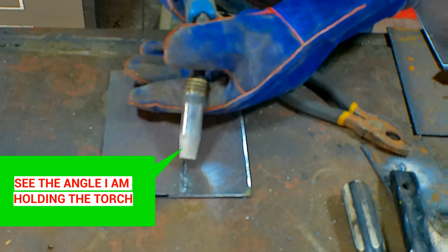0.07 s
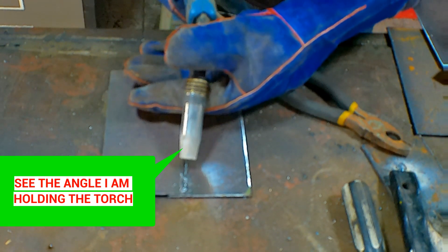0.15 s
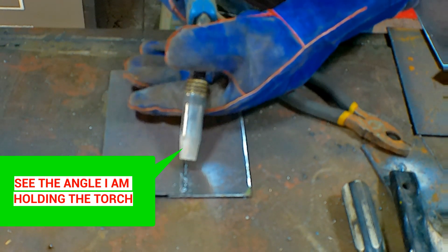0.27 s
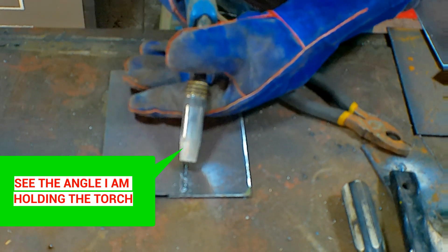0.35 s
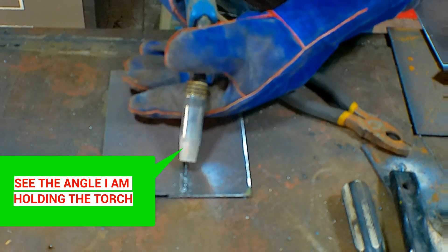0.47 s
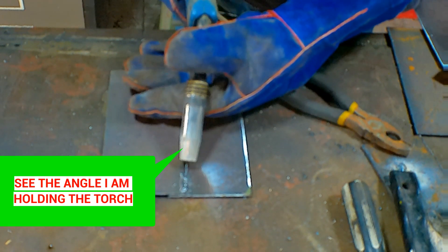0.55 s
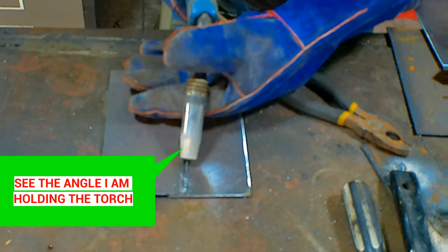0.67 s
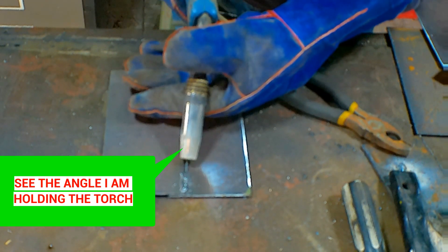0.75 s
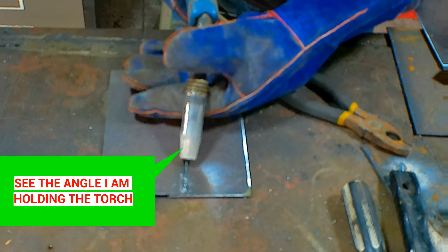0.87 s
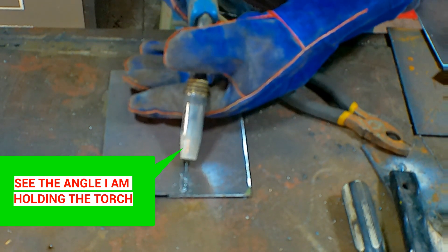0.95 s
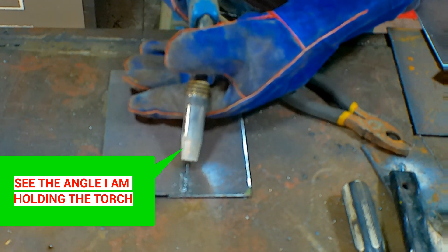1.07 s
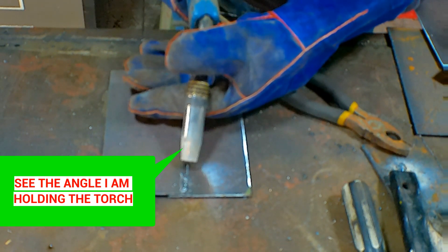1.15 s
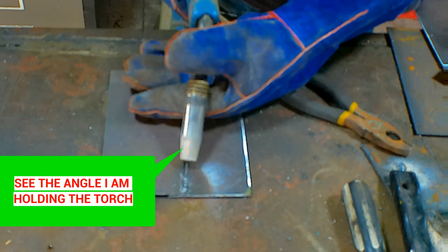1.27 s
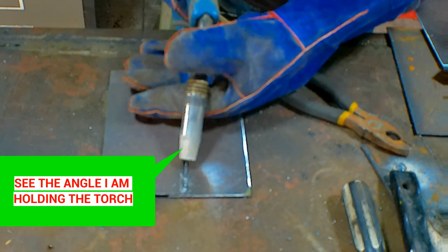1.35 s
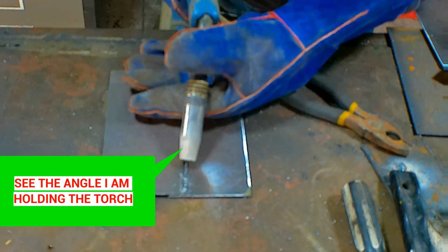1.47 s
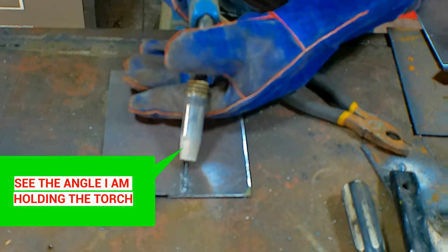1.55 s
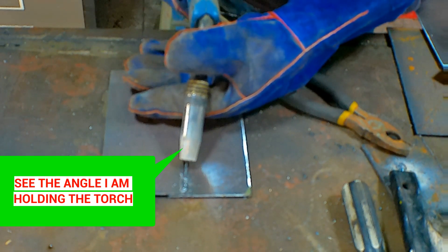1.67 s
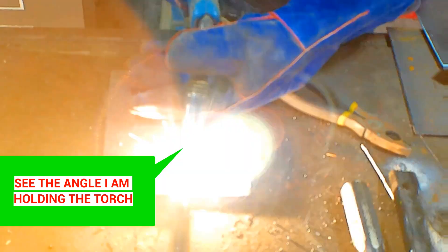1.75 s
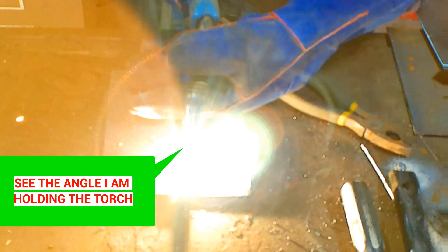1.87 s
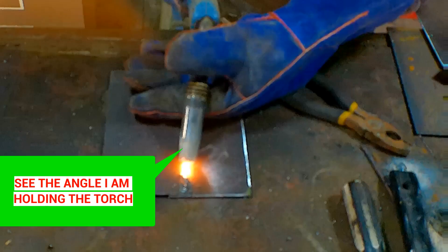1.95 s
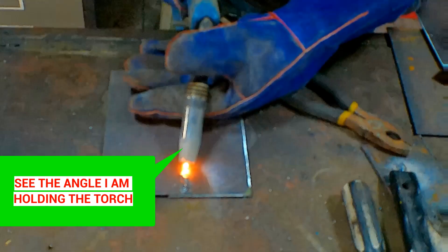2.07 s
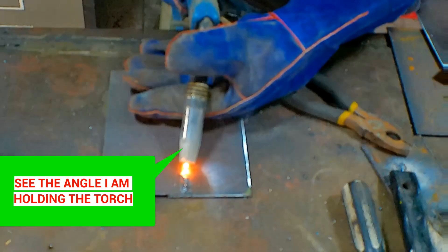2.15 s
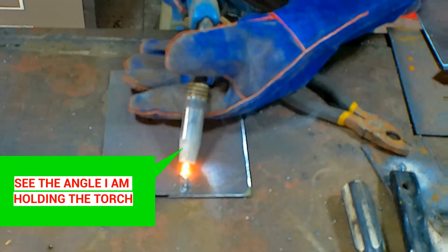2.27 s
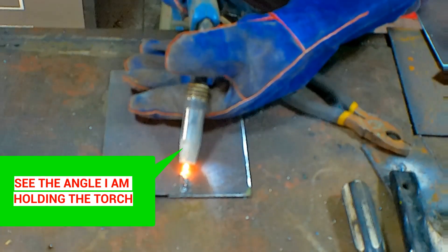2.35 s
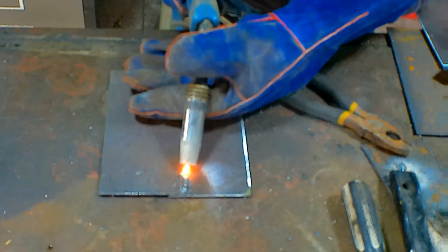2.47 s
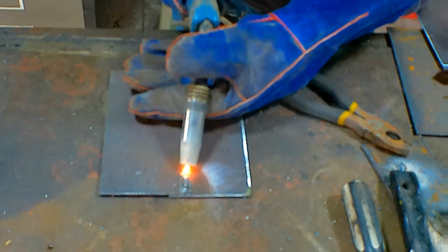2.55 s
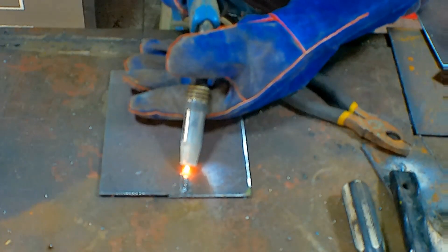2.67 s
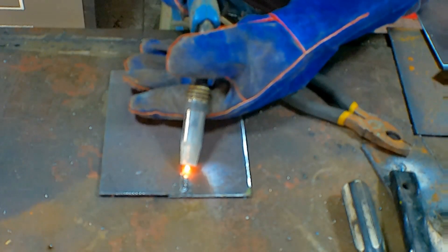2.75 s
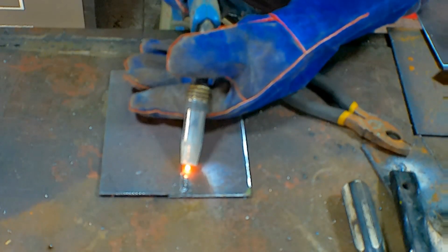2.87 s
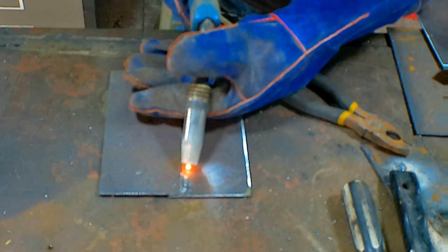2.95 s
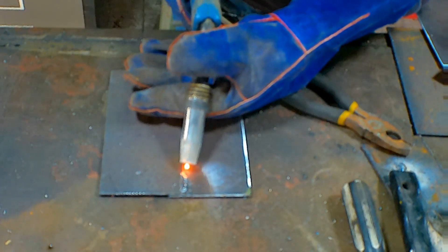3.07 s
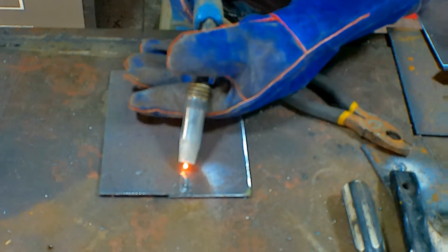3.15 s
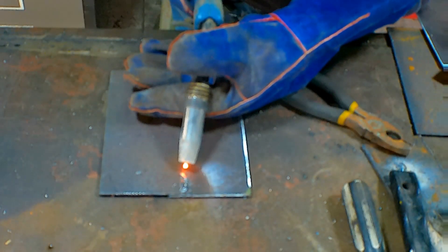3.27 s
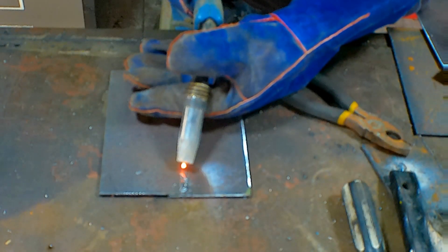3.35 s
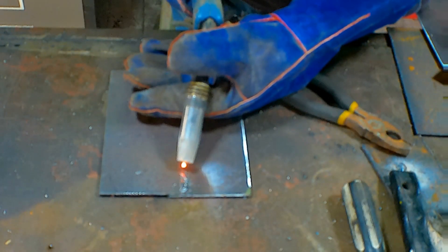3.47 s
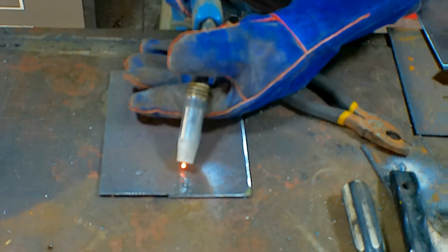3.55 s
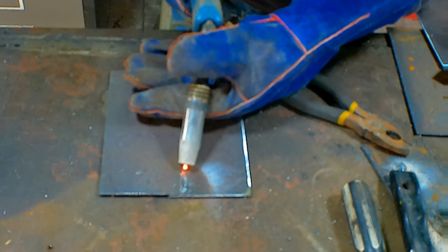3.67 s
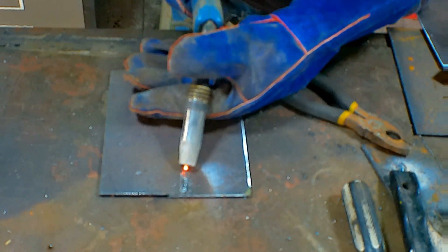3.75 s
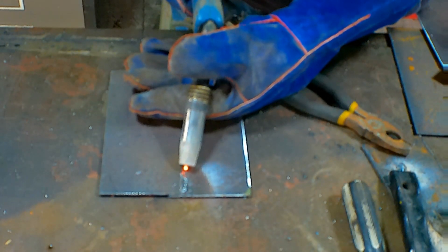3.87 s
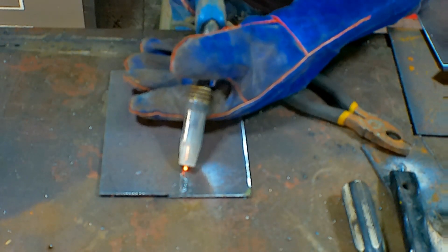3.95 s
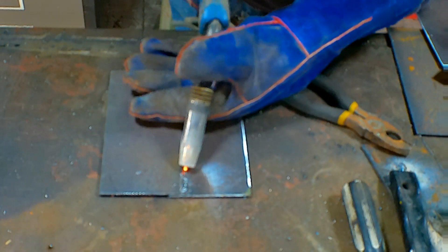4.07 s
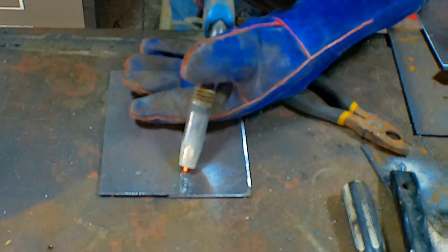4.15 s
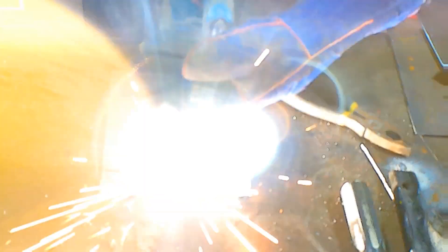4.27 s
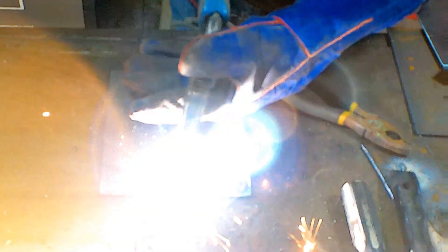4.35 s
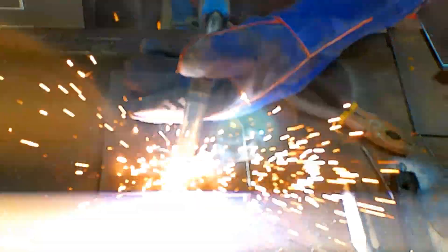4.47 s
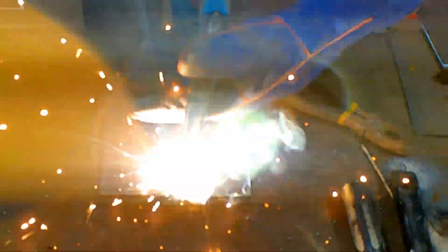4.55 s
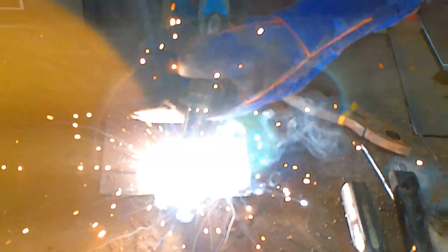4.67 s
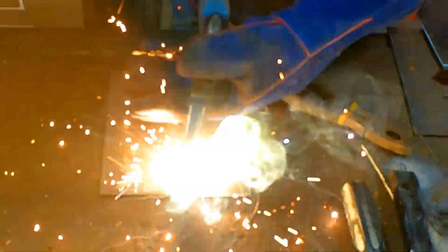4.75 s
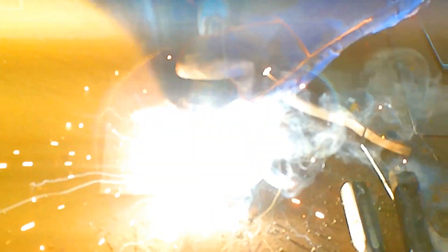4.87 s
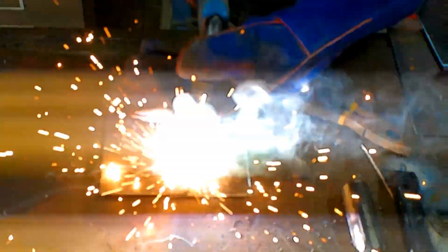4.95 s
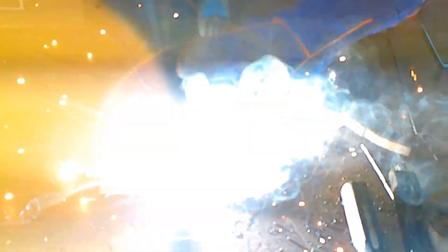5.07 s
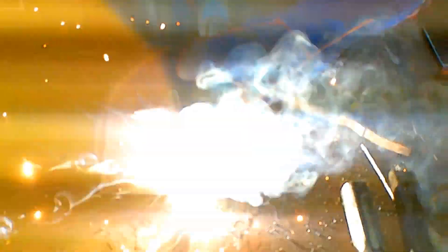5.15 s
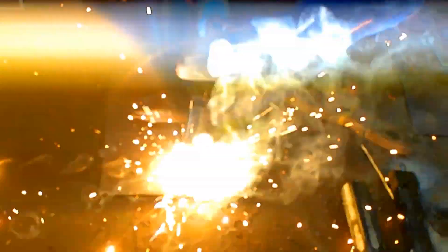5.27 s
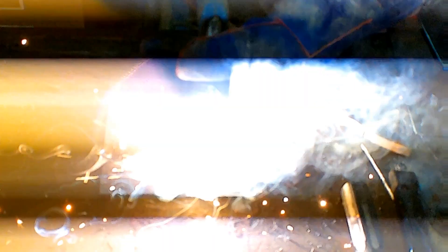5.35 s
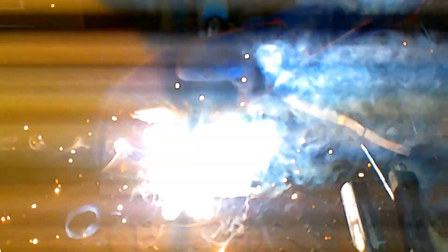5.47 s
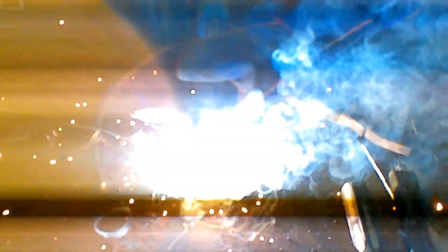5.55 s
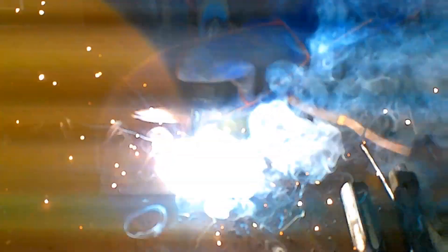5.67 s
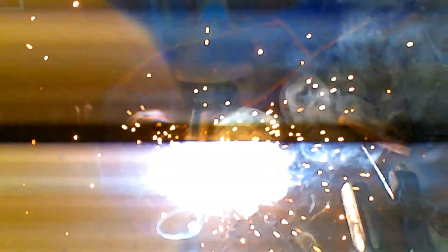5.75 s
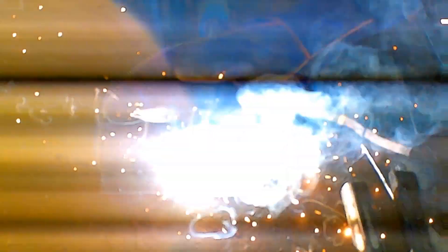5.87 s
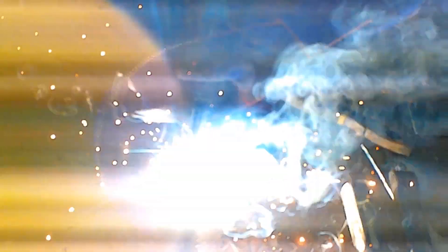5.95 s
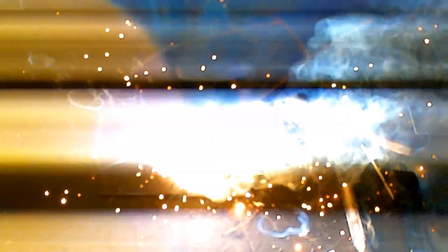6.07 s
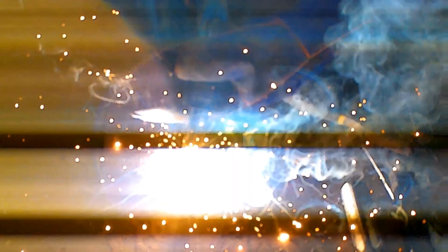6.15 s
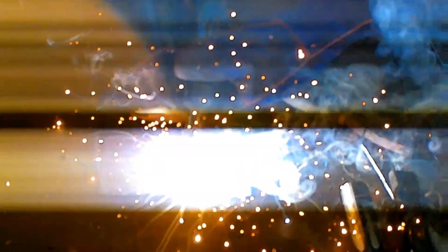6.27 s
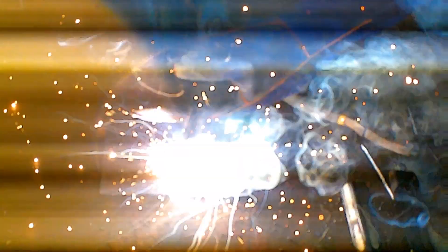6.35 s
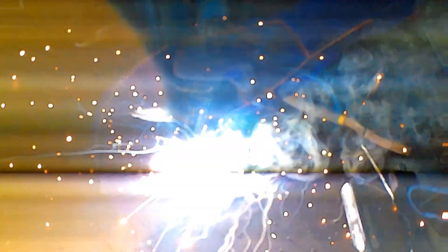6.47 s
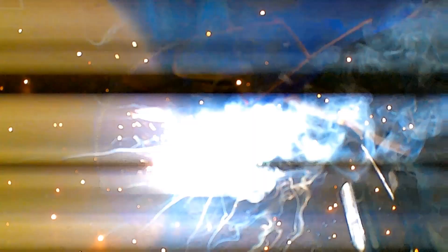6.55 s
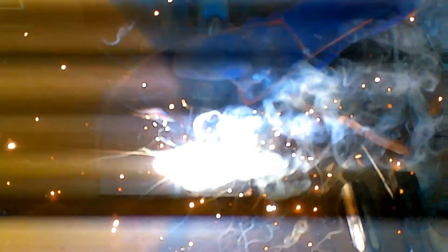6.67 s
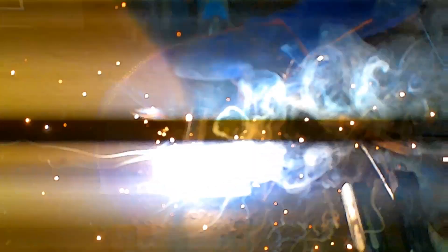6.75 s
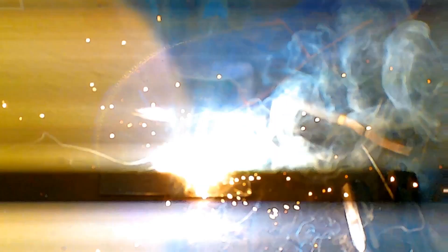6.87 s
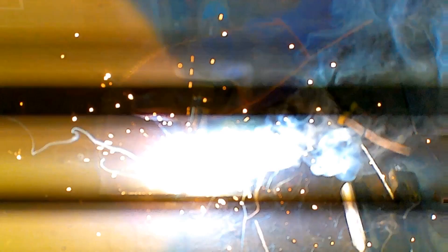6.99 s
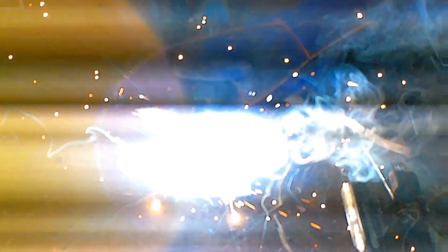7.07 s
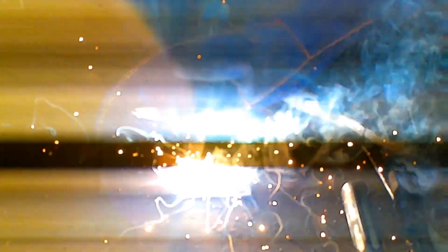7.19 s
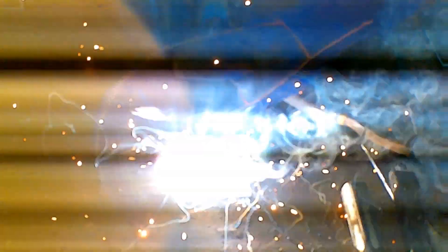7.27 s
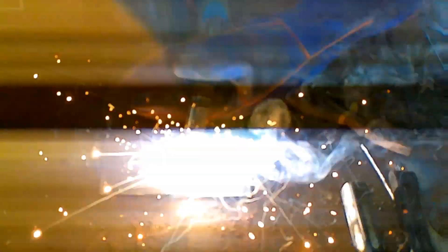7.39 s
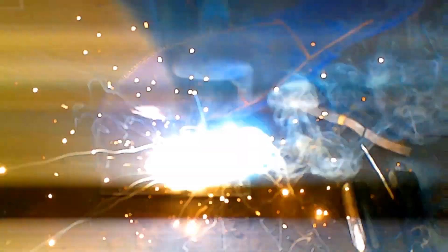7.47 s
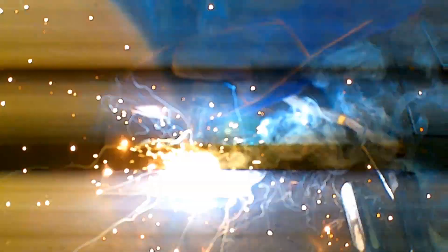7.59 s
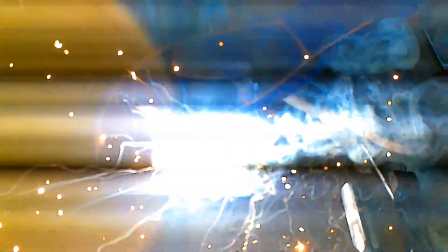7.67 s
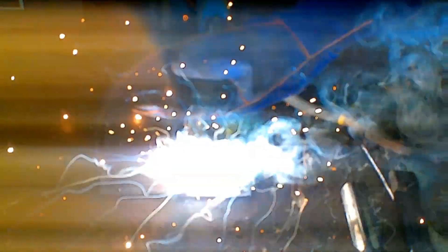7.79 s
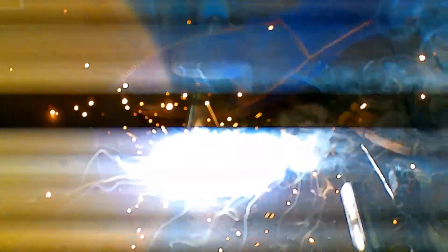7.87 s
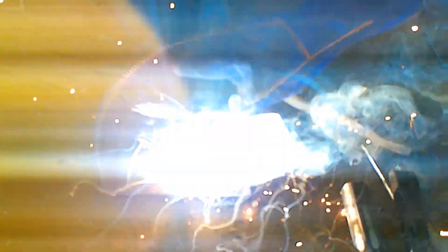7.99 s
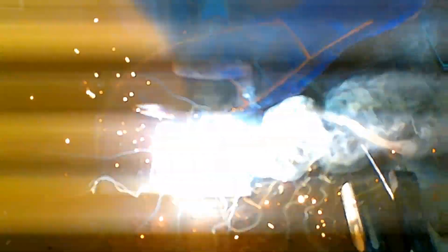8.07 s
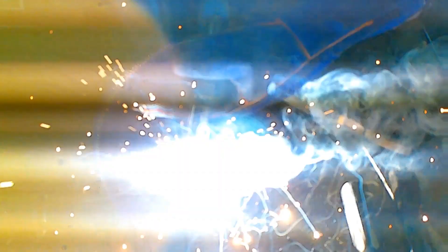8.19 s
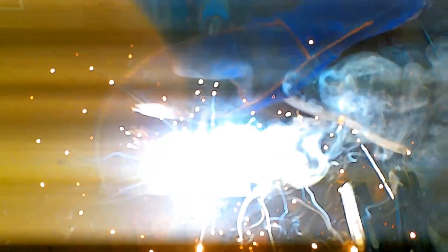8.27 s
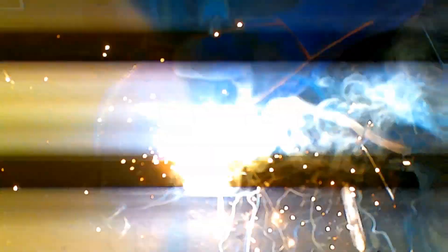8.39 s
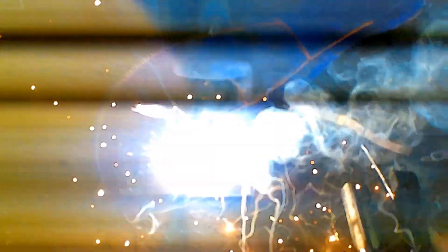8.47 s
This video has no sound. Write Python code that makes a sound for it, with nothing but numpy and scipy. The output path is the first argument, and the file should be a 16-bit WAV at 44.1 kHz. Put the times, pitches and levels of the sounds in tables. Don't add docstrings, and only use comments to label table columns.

```python
import sys
import numpy as np
from scipy import signal
from scipy.io import wavfile
from scipy.ndimage import uniform_filter1d

SR = 44100
rng = np.random.default_rng(int(sys.argv[2]) if len(sys.argv) > 2 else 0)


def unload_audio(sound):
    columns = np.transpose(np.atleast_2d(sound))
    steps = np.round(np.clip(columns, -1, 1) * 32767)
    wavfile.write(sys.argv[1], SR, steps.astype(np.int16))


def gain_from_db(level_db):
    decades = np.asarray(level_db, float) / 20
    return 10 ** decades


N = 375732


def evened(x):
    return x / np.sqrt(np.mean(x ** 2) + 1e-20)


def read(points, hz):
    f, value = np.transpose(points)
    return np.interp(np.log(hz + 1), np.log(f + 1), value)


def along(rows, column=1, off=-120.):
    rows = np.array(rows)
    return np.interp(np.arange(N) / SR, rows[:, 0], rows[:, column], off, off)


def humps(rows, t):
    return sum(height * np.maximum(1 - abs(t - middle) / half, 0) for middle, half, height in rows)


def causal(db):
    mirrored = np.r_[db, db[-2:0:-1]]
    log = np.log(gain_from_db(np.maximum(mirrored, -100)))
    taps = np.fft.ifft(np.exp(log - 1j * signal.hilbert(log).imag)).real[:len(db)]
    return taps / np.linalg.norm(taps)


def train(s, size):
    return np.bincount(np.round(np.asarray(s) * SR).astype(int), size, N)[:N]


def dying(x, seconds):
    return signal.lfilter([1], [1, -np.exp(-1 / (seconds * SR))], x)


def wander(hz):
    return evened(signal.lfilter(*signal.butter(2, hz, fs=SR), rng.standard_normal(N)))


def ringing(x, hz, t60):
    t = np.arange(int(t60 * SR)) / SR
    mode = gain_from_db(-60 * t / t60) * np.sin(2 * np.pi * hz * t)
    return signal.oaconvolve(x, mode)[:N]


def puff(x, seconds):
    u = np.arange(1200) / (seconds * SR)
    push = -(1 - u) * np.exp(-u) * np.minimum(u / 0.26, 1)
    return signal.oaconvolve(x, push)[:N]


def hum(lines, drift, depth_db):
    turns = np.cumsum(1 + drift * wander(3.5)) / SR
    out = np.zeros(N)
    for hz, db in lines:
        level = np.sqrt(2) * gain_from_db(db + depth_db * wander(8))
        out += level * np.sin(2 * np.pi * (hz * turns + rng.random()))
    return out


# pitch_hz, density_db [dB per Hz]
AIR = [(12, -46.5), (20, -8), (22, 2), (48, -7), (177, -5.5), (216, -14), (248, -8.5), (277, -6),
       (590, -6.5), (642, -6), (1220, -10.5), (1710, -16), (5530, -30), (6180, -34.5), (16000, -39.5)]


def fan_air():
    frames, hz = N // 256 + 5, np.fft.rfftfreq(1024, 1 / SR)
    a, b, patches = rng.standard_normal((frames, 513, 3)).T
    patches = evened(uniform_filter1d(uniform_filter1d(patches, 8, 0), 12, 1))
    spectrum = (a + 1j * b) * gain_from_db(read(AIR, hz)[:, None] + 1.7 * patches)
    air = signal.istft(spectrum, nperseg=1024, noverlap=768)[1][:N]
    return gain_from_db(-39.5) * evened(air)


# pitch_hz, level_db [rms]
FAN = [(177.6, -51), (253, -53.5), (403.7, -53), (506, -59), (602.9, -51.5), (1206, -55.5)]
# pitch_hz, level_db [rms]
FEEDER = [(290.7, -50), (872.1, -51.5), (1157, -53), (5405, -64)]
# pitch_hz, level_db [rms]
GEARS = [(4700, -66), (7267, -72), (10584, -76)]
# time_s, level_db
FEEDING = [
    (1.95, -30),
    (2.03, 0.5),
    (3.03, 0.5),
    (3.08, -12),
    (3.28, -12),
    (3.36, -.5),
    (4.26, 0.5),
]


def machine():
    feeder = hum(FEEDER, 0.00027, 1) + wander(70) * hum(GEARS, 0.00052, 1)
    return fan_air() + hum(FAN, 0.0019, 3.3) + gain_from_db(along(FEEDING)) * feeder


# middle_s, half_length_s, level_db
RUSTLES = [
    (.2, .03, -59),
    (.32, .06, -51),
    (.59, .05, -54),
    (.72, .05, -58),
    (1.035, .06, -52),
    (3.76, .07, -53),
]


def glove():
    stroke = humps([(s, half, gain_from_db(db)) for s, half, db in RUSTLES], np.arange(N) / SR)
    clumps = rng.exponential(1, N) * (rng.random(N) < 250 / SR)
    grains = dying(clumps, .003) * rng.standard_normal(N)
    return stroke * evened(signal.lfilter(*signal.butter(1, [1300, 6000], "band", fs=SR), grains))


# start_s, scratch_db, ring_hz, ring_db
TICKS = [(.0462, -38, 5400, -50), (.128, -44, 5300, -46), (.195, -54, 1900, -39), (.2835, -48, 2400, -42),
         (.325, -48, 2120, -40), (.5931, -42, 5300, -41), (.616, -39, 5200, -36), (.7587, -47, 6200, -50),
         (.832, -56, 780, -33), (0.9914, -27.5, 2380, -36), (1.0173, -31, 7000, -44),
         (1.032, -44, 1575, -27), (1.052, -50, 800, -28), (1.105, -34, 5300, -41), (1.343, -42, 5740, -47),
         (2.5767, -48, 2440, -37), (2.615, -50, 2460, -40), (2.7222, -43, 2450, -43),
         (2.87, -39, 10200, -54), (3.708, -32, 2510, -28), (3.7439, -46, 2500, -38.5),
         (3.78, -43, 2520, -35), (3.8, -40, 2520, -38), (3.801, -46, 10300, -50)]


def ticks():
    out, t = np.zeros(N), np.arange(2600) / SR
    chance = rng.standard_normal((len(TICKS), 2, len(t)))
    band = signal.butter(2, [1800, 11500], "band", fs=SR)
    for (s, db, hz, ring_db), (noise, shake) in zip(TICKS, chance):
        scratch = signal.lfilter(*band, noise) * np.exp(-t / 0.0038)
        fuzz = 0.73 + evened(uniform_filter1d(shake, 40))
        ring = np.sin(2 * np.pi * hz * t) * fuzz * np.exp(-t / 0.0074)
        out[round(s * SR):][:len(t)] += gain_from_db(db) * scratch + gain_from_db(ring_db) * ring
    return out


# start_s, tick_db, ring_db
TAPS = [
    (1.766, -2.5, -1),
    (1.7716, -16, -9),
    (4.2674, -1, -7),
    (4.279, -27, 5),
]
# pitch_hz, level_db, t60_s
WIRE = [(586, -16.5, 0.13), (1600, -6, 0.12), (1667, 4.5, 0.062), (2194, 0.5, 0.04), (2450, 0.5, 0.053),
        (2610, -2, 0.055), (3470, -8, 0.037)]


def wire():
    s, tick_db, ring_db = np.transpose(TAPS)
    tick = dying(train(s, gain_from_db(tick_db)), 0.0037) * rng.standard_normal(N)
    tick = signal.lfilter(*signal.butter(1, 7000, fs=SR), tick)
    knocks = train(s, gain_from_db(ring_db - 15.5))
    return tick + sum(gain_from_db(db) * ringing(knocks, hz, t60) for hz, db, t60 in WIRE)


# start_s, end_s, sizzle_start_db, sizzle_end_db
SPELLS = [(1.809, 1.925, -13, -43), (4.318, 4.36, -21, -29), (4.42, 4.472, -19, -18),
          (4.482, 4.558, -13.5, -19), (4.598, 4.649, -22, -20), (4.654, 4.719, -17, -18),
          (4.737, 4.828, -15, -32), (4.882, 4.988, -9, -24), (4.994, 5.104, -10, -24.5),
          (5.174, 5.331, -11.5, -20.5), (5.386, 5.452, -18, -12), (5.489, 5.706, -13.5, -10.5),
          (5.717, 5.771, -20.5, -18.5), (5.769, 5.841, -13.5, -9.5), (5.841, 6.449, -10, -7.5),
          (6.45, 8.6, -10.5, -11.5)]
# middle_s, half_length_s, depth_db
FALTERS = [
    (6.476, 0.0071, -3),
    (6.504, 0.017, -16),
    (6.52, 0.0088, -14),
    (6.573, 0.034, -11.5),
    (6.672, 0.015, -9),
    (6.688, .012, -19),
    (7.764, 0.028, -11.5),
    (8.495, .03, -3.5),
]


def current():
    level = np.zeros(N)
    for start, end, first_db, last_db in SPELLS:
        level += gain_from_db(along([(start, first_db), (end, last_db)]))
    return level * gain_from_db(humps(FALTERS, np.arange(N) / SR))


def shorts(burning):
    place, size, low = np.clip(rng.standard_normal((600, 3)), -1.8, 1.8).T
    s = SPELLS[1][0] + (np.arange(600) + .25 * place + .5) / 110
    keep = s < N / SR
    arc_db = 20 * np.log10(burning[(s[keep] * SR).astype(int)])
    peak_db = arc_db + 9 + 4 * size[keep]
    blast_db = -14 + 4.5 * low[keep]
    return np.transpose([s[keep], peak_db, blast_db])


def spitting(bursts):
    fade = dying(bursts, 0.0015) + gain_from_db(-15.0) * dying(bursts, 0.0035)
    return fade * np.tanh(2 * rng.standard_normal(N))


def spatter_drops():
    settled_s = 5.49
    spread_db = np.where(np.arange(N) < settled_s * SR, 2, 4.5)
    sizes = gain_from_db(spread_db * np.minimum(rng.exponential(1, N), 3.2))
    return sizes * (rng.random(N) < 450 / SR)


def shock(bursts, drops, burning):
    kicks = gain_from_db(2.5) * bursts + gain_from_db(-8.5) * burning * evened(drops)
    return np.convolve(kicks, [-0.81, -0.79, 0.48, 0.5, 0.6])[:N]


def sizzling(drops, burning):
    spatter = evened(dying(drops, 0.00045) * rng.standard_normal(N))
    hiss = rng.standard_normal(N) * gain_from_db(2.1 * wander(80))
    return burning * (gain_from_db(-4.5) * spatter + gain_from_db(-7) * hiss)


def blasting(blasts):
    blast = signal.lfilter(*signal.butter(1, 1800, fs=SR), puff(blasts, 0.00039))
    thump = gain_from_db(-26.0) * puff(blasts * blasts, 0.00082)
    return gain_from_db(-1) * blast + thump


# pitch_hz, density_db [dB per Hz]
COLD = [(88, -33), (150, -10), (302, -3.5), (501, -6), (784, 0.5), (1300, -6.5), (1740, -4.5), (2380, -6.5),
        (2620, 0), (3060, -8.5), (7700, -10.5), (8930, -3), (10200, -9.5), (13000, -15), (15700, -17)]
# pitch_hz, density_db [dB per Hz]
MOLTEN = [(88, -29), (150, -9.5), (291, -4), (511, -6.5), (769, -2), (1350, -7), (2300, -6), (2780, 2),
          (3650, -11.5), (4400, -7.5), (5600, -4.5), (8600, -12), (10300, -3.5), (13000, -13), (15700, -14)]
# time_s, molten_share [0-1]
POOL = [
    (5.0, 0.1),
    (5.3, 0.28),
    (5.8, 0.78),
]
# pitch_hz, width_hz, level_db
PLATE = [(740, 97, -6), (1101, 89, 1.5), (1704, 90, 7.5), (2157, 140, 6.5), (2630, 580, -1),
         (3284, 180, 5.5), (3850, 53, 8.5), (4270, 270, 5.5), (4680, 89, 4.5), (5500, 310, 3.5),
         (6030, 200, 5), (6580, 110, 3), (7000, 190, 6), (7440, 210, 6.5)]


def coloured(x):
    hz = np.fft.rfftfreq(4096, 1 / SR)
    plate = sum(gain_from_db(db) ** 2 / (1 + (2 * (hz - f) / width) ** 2) for f, width, db in PLATE)
    plate_db = 10 * np.log10(0.099 + plate)
    plate_db -= uniform_filter1d(plate_db, 150)
    share = np.clip(np.interp(np.arange(N) / SR, *np.transpose(POOL)), 0, 1)
    cold = signal.oaconvolve(x, causal(read(COLD, hz) + .15 * plate_db))[:N]
    molten = signal.oaconvolve(x, causal(read(MOLTEN, hz) + .7 * plate_db))[:N]
    return (1 - share) * cold + share * molten


# start_s, peak_db, blast_db [relative to peak]
FLASH = [
    (1.8105, 6.5, -6),
    (1.8208, -17, -14),
    (2.02, -21.5, -26),
]
# start_s, peak_db,
# blast_db [relative to peak]
STUTTER = [(4.2816, 6, 3), (4.2932, 5, -11), (4.3133, 2, -9), (4.372, -11, -16), (4.428, -3, -17),
           (4.4512, -12, 0), (4.458, -1.5, -24), (4.4907, -2, -20), (4.5009, 5.5, -15), (4.531, 6, -18),
           (4.5563, -12, -21), (4.576, -2, -10), (4.598, -2, -21), (4.6092, 5, 0), (4.645, 0, 3),
           (4.6652, 5.5, -10), (4.672, 4, -15), (4.683, 4, -4), (4.6977, 0, -1), (4.739, -2, -15),
           (4.7505, 7.5, -16), (4.7566, 5, -13), (4.782, 3.5, -15), (4.8032, 4, -17), (4.818, 5.5, -4),
           (4.8836, 11, 1.5), (4.9313, 2.5, -16), (4.953, -2, -14), (4.966, 4, -13), (4.975, -3, -3)]
# start_s, peak_db, blast_db [relative to peak]
POOLING = [(5.015, 7, -11), (5.0341, 9, -13), (5.0588, 1.5, -21), (5.0695, -4, -13), (5.0798, -5, -8),
           (5.0895, -2, -17), (5.1012, -4, -9), (5.1763, 11, -2), (5.259, -4, 14.5), (5.2671, 6.5, 2),
           (5.2805, -1, 10), (5.2954, 4.5, -5), (5.3024, 6, -3), (5.3204, 2, -9), (5.35, 3, -25),
           (5.3849, -2, -16), (5.4159, 6.5, 4), (5.4238, 8, -3), (5.4341, 6, -23), (5.4438, 3.5, -11),
           (5.477, 4, -21), (5.4892, -2, -16), (5.496, 8, -16), (5.5104, 9, -7), (5.5229, 6, -17),
           (5.5398, 3, 4), (5.5494, 3, 9), (5.5576, 8, -15), (5.5732, 6, -31), (5.5878, 8, -15)]
# start_s, peak_db, blast_db [relative to peak]
STEADY = [(5.6327, 5, -11), (5.661, 11.5, -0.5), (6.0394, 16.5, -7), (6.0725, 9, -1.5), (6.1318, 12, -13),
          (6.1533, 12, -1), (6.172, 6, -15), (6.251, 12, -9), (6.334, 7, 6), (6.3538, 4, -6),
          (6.5107, 5.5, 3), (6.529, 4, -21), (6.5931, 0.5, 5.5), (6.7154, -2, -10), (6.6743, 2, -18),
          (6.7, 2, -8), (6.863, 3, 4), (6.885, 5, -17), (6.9507, 12, -15), (7.0847, 5, -13),
          (7.116, 4, -21), (7.177, 15, -12), (7.3225, 15, -19), (7.5636, -1, -10), (7.9808, 11, -13),
          (8.1978, 9, -7), (8.2249, 8.5, -8), (8.308, 13, -4), (8.4543, 8.5, 0.5), (8.4783, 12, -16)]


def arc():
    burning = current()
    s, db, low_db = np.vstack([FLASH, STUTTER, POOLING, STEADY, shorts(burning)]).T
    bursts = train(s, gain_from_db(db))
    drops = spatter_drops()
    bright = gain_from_db(-4) * spitting(bursts) + shock(bursts, drops, burning) + sizzling(drops, burning)
    return coloured(bright) + blasting(train(s, gain_from_db(db + low_db)))


# pitch_hz, t60_s
ROOM = [(150, 0.42), (700, 0.28), (2500, 0.3), (5000, 0.43), (12000, 0.22)]
# delay_s, level_db
ECHOES = [
    (.0021, -24),
    (0.0109, -25.5),
    (.016, -22.5),
]


def tail():
    taps = np.zeros(SR // 2)
    at = np.arange(200, SR // 2 - 20, 20)
    taps[at + rng.integers(0, 20, len(at))] = rng.choice([-1., 1.], len(at))
    hz, t, z = signal.stft(taps, SR, nperseg=256)
    taps = signal.istft(z * gain_from_db(-60 * t / read(ROOM, hz)[:, None]), SR, nperseg=256)[1]
    walls_s = 0.011
    taps[:round(walls_s * SR)] *= gain_from_db(-3.5)
    taps *= gain_from_db(-10.0) / np.linalg.norm(taps)
    for s, db in ECHOES:
        taps[round(s * SR)] += gain_from_db(db)
    return taps


def shop(x):
    turn = np.cumsum(23 + 8 * wander(5.97)) / SR % 6
    out = x.copy()
    for k in range(6):
        window = np.cos(np.pi / 2 * np.clip((turn - k + 3) % 6 - 3, -1, 1))
        out += signal.oaconvolve(x * window, tail())[:N]
    return out


def scene():
    bench = glove() + ticks() + wire() + arc()
    return (machine() + shop(bench))[None]


def top_cut(x):
    return signal.sosfilt(signal.butter(12, 16520, fs=SR, output="sos"), x)


def record(dry):
    ceiling, edge_hz = .87, 15800
    clipped = np.clip(dry, -ceiling, ceiling)
    edge = signal.firwin(511, edge_hz, window=("kaiser", 7), fs=SR)
    mix = signal.oaconvolve(clipped, edge[None], "same")
    return top_cut(mix)


dry = scene()
out = record(dry)
unload_audio(out)
```